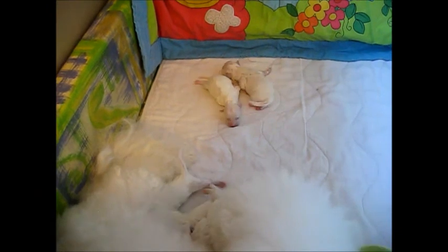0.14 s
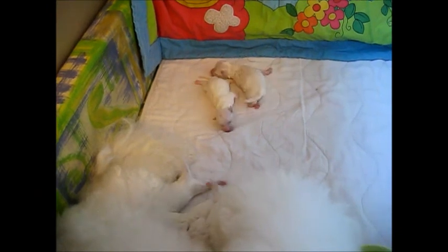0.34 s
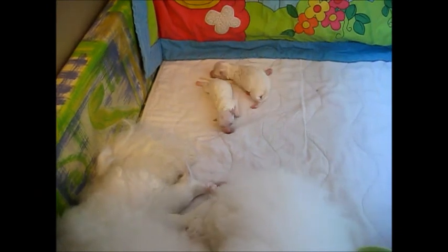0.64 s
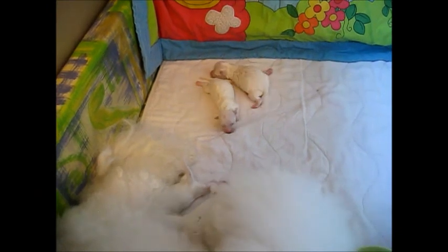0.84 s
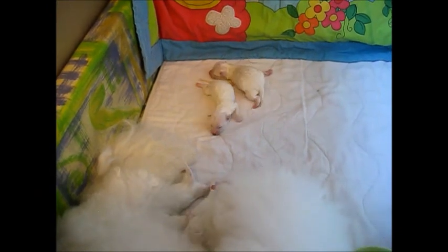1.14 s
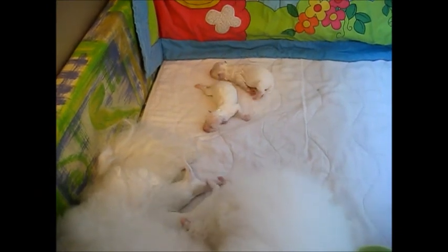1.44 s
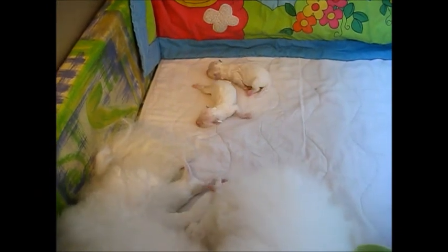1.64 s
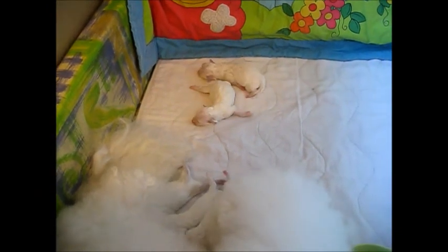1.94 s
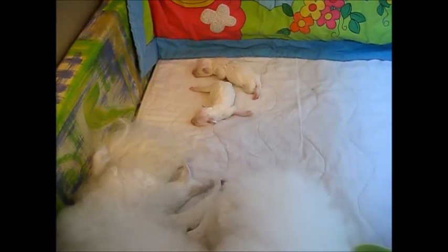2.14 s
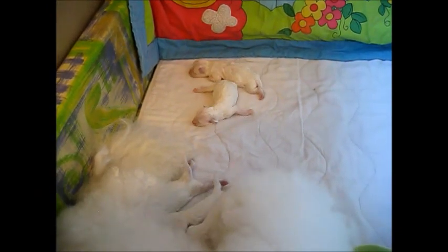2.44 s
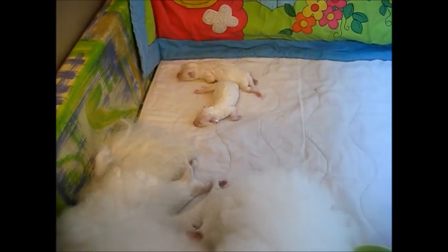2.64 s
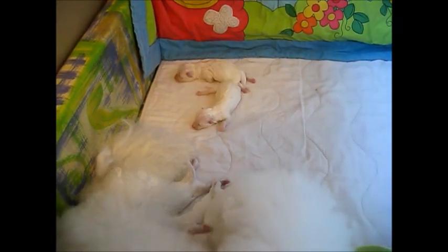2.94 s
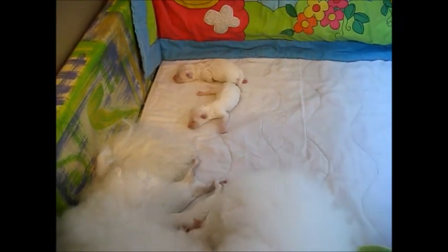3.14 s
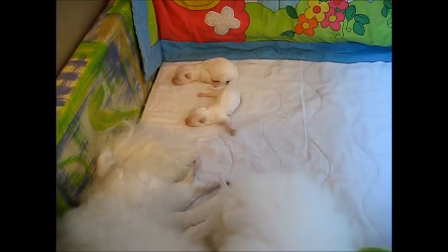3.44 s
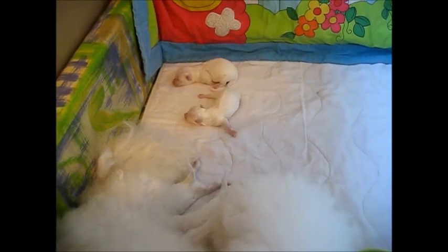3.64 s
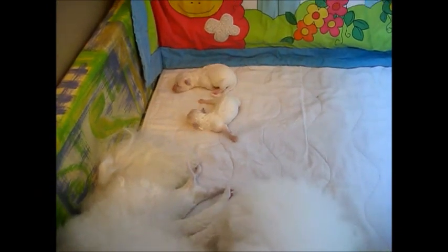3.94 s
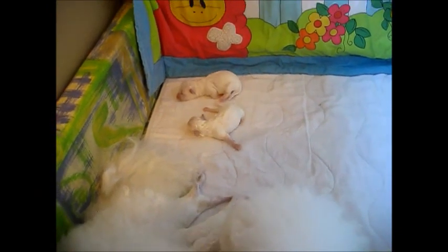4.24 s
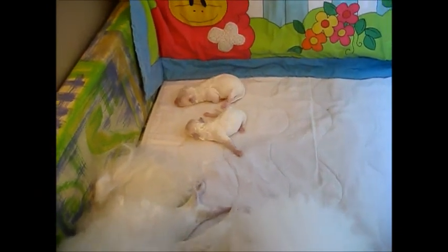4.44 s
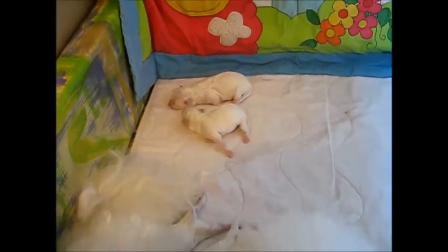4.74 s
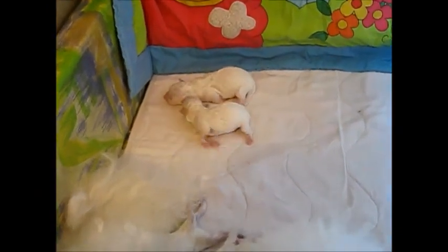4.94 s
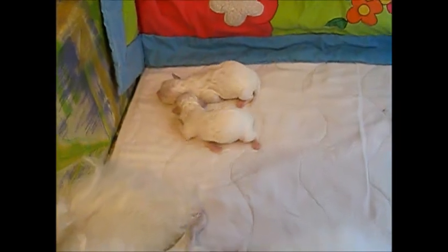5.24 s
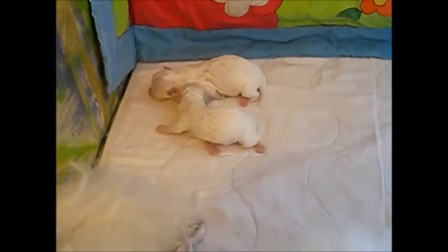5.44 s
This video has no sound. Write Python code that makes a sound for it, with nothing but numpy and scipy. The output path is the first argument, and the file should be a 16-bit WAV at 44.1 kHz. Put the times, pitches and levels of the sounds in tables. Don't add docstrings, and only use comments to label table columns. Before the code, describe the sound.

Bright hiss swells up over low room rumble and faint hum while tiny puppies squeak and whimper. One nearer pup leads with gliding cries; another briefly overlaps with thin high whistles. Light smacks and ticks appear early, louder clacks near four seconds. Bedding rustles, little snorts and breathy grunts mix into the later cries. Close, dry indoor sound, practically the same on both sides.

```python
import sys
import numpy as np
from scipy import signal
from scipy.fft import rfft, irfft
from scipy.io import wavfile
from scipy.ndimage import uniform_filter1d, minimum_filter1d

SR = 44100
rng = np.random.default_rng(int(sys.argv[2]) if len(sys.argv) > 2 else 0)


def transcribe(u):
    v = np.clip(np.atleast_2d(u).T, -1, 1)
    q = np.round(v * 32767).astype(np.int16)
    wavfile.write(sys.argv[1], SR, q)


def boost(x):
    u = np.asarray(x, float) / 20
    return 10 ** u


N = 246519


def evened(x):
    return x / np.sqrt(np.mean(x ** 2) + 1e-20)


def smooth_twice(x, size):
    return uniform_filter1d(uniform_filter1d(x, size=size), size=size)


def add(mix, start, sound):
    part = mix[round(start * SR):][:len(sound)]
    part += sound[:len(part)]


def columns(rows):
    s, *rest = np.transpose(rows)
    t = np.arange(s[0], s[-1], 1 / SR)
    return [np.interp(t, s, column) for column in rest]


def over_time(table):
    return np.interp(np.arange(N) / SR, *np.transpose(table))


def resonate(x, hz, width):
    turn = np.exp(2j * np.pi * np.cumsum(hz * np.ones(len(x))) / SR)
    r = np.exp(-np.pi * width / SR)
    return 2 * (turn * signal.lfilter([1 - r], [1, -r], x / turn)).real


def coloured(spectrum, patchy_db):
    frames, hz = N // 256 + 5, np.fft.rfftfreq(1024, 1 / SR)
    real, imaginary, patches = rng.standard_normal((frames, 513, 3)).T
    patches = evened(uniform_filter1d(uniform_filter1d(patches, size=14, axis=0), size=12, axis=1))
    streaks = rng.standard_normal((frames, 513)).T
    patches += 1.2 * evened(uniform_filter1d(streaks, size=30, axis=1))
    f, db = np.transpose(spectrum)
    shape_db = np.interp(np.log(hz + 1), np.log(f + 1), db)[:, None]
    bins = (real + 1j * imaginary) * boost(shape_db + patchy_db * patches)
    return evened(signal.istft(bins, nperseg=1024, noverlap=768)[1][:N])


# frequency in Hz, density in dB per Hz.
HISS = [(710, -21.5), (1200, -6.5), (1320, -9.5), (1430, -6.5), (1730, -8), (2320, -4), (2550, -4),
        (5100, -3), (7200, -6.5), (7930, -9), (9130, -4.5), (11500, -0.5), (13500, -7.5), (15800, -18.5)]
# time in seconds, hiss level in dB.
HISS_GAIN = [(0, -51.5), (.07, -50.5), (.13, -44.5), (.34, -44), (.45, -38), (0.601, -37.5), (.95, -37),
             (1.1, -39.5), (1.28, -35), (1.46, -36), (1.5, -38), (2.355, -39), (2.365, -36.5), (3.521, -35),
             (3.85, -37), (5.41, -37), (5.44, -34.5), (5.59, -36.5)]
# time in seconds, change in dB.
MID_DRIFT = [(0, -1), (1.5, 0), (2, 1.5), (2.35, 1), (2.6, -3), (2.9, -3), (3.3, -3), (3.5, 0), (5.59, 0)]
# time in seconds, change in dB.
TREBLE_WAKE = [(0, -6), (.25, -6), (.33, -2), (.45, 0)]


def hiss():
    steady = coloured(HISS, patchy_db=0.77)
    treble = signal.filtfilt(*signal.butter(3, 13900 / (SR / 2), "high"), steady)
    middle = signal.filtfilt(*signal.butter(2, [1700, 4300], "band", fs=SR), steady)
    middle *= boost(over_time(MID_DRIFT)) - 1
    treble *= boost(over_time(TREBLE_WAKE)) - 1
    return boost(over_time(HISS_GAIN) + 1.5) * (steady + middle + treble)


# frequency in Hz, density in dB per Hz.
RUMBLE = [(12, -35), (20, 9.5), (70, -9.5), (97, -3), (185, -5.5), (507, -3), (538, -3), (659, -3),
          (1260, -7.5), (1480, -6), (2500, -9.5), (3250, -7), (5500, -120)]
# frequency in Hz, width in Hz, level in dB.
HUM = (99, 12, -62)
# start in seconds, end in seconds, frequency in Hz, width in Hz, level in dB.
WHINE = (.08, 0.5, 10030, 60, -58)


def room():
    hz, width, db = HUM
    tones = boost(db) * evened(resonate(rng.standard_normal(N), hz, width))
    start, end, hz, width, db = WHINE
    size = round((end - start) * SR)
    motor = evened(resonate(rng.standard_normal(size), hz, width))
    add(tones, start, boost(db) * motor * signal.windows.tukey(size, .5))
    return boost(-48) * coloured(RUMBLE, patchy_db=1.0) + tones


# frequency in Hz, gain in dB.
THROAT = [(800, -0.5), (1300, -1), (2000, -1), (2900, 0), (3150, 1), (3500, 1), (4150, -1.5), (4700, -29)]


def squeaks(syllables):
    controls = np.zeros((4, N + 2))
    for rows, third_db in syllables:
        curves = np.array(columns(np.c_[rows, np.full(len(rows), third_db)]))
        first = round(rows[0][0] * SR)
        controls[:, first:][:, :curves.shape[1]] = curves[:, :N - first]
    sung = np.flatnonzero(controls[0])
    hz, effort_db, bright_db, third_db = (np.interp(np.arange(N), sung, c[sung]) for c in controls)
    breath = minimum_filter1d(-minimum_filter1d(-1. * (controls[0, :N] > 0), size=380), size=380)
    hz = smooth_twice(hz, 150)
    wobble = evened(uniform_filter1d(rng.standard_normal((4, N)), size=250, axis=1))
    turns = np.cumsum(hz * (1 + .002 * wobble[0])) / SR
    steps_db = [0 * hz, bright_db, third_db + 0.24 * bright_db]
    flutter_db = np.array([[.7], [1.1], [2.0]]) * wobble[1:]
    out = np.zeros(N)
    for k in range(3):
        throat_db = np.interp((k + 1) * hz, *np.transpose(THROAT))
        level = uniform_filter1d(breath * boost(effort_db + steps_db[k] + throat_db), size=220)
        out += level * boost(flutter_db[k]) * np.cos(2 * np.pi * (k + 1) * turns)
    return -np.sqrt(2) * out


# start in seconds, length in seconds, effort in dB, pitch in Hz, late glide in Hz.
PEEPS = [
    (0.251, .055, -50, 1610, -15),
    (2.069, .014, -38.5, 1603, -11),
    (4.83, 0.025, -37, 1342, 20),
    (4.857, .035, -48, 1300, -60),
    (5.168, .055, -35.5, 1912, -200),
]


def peep(start, length, db, hz, glide_hz):
    u = np.linspace(0, 1, num=6)
    return np.c_[start + length * u, hz + glide_hz * u ** 3.5, db - 3 * u, -14 + 0 * u]


# time in seconds, pitch in Hz, effort in dB, mouth brightness in dB per harmonic.
EARLY_CRIES = [
    [(.082, 1800, -48, -10), (.094, 1790, -39, -9), (.108, 1860, -40, -20), (.128, 1898, -37, -10),
     (.148, 1860, -33.5, -19), (.169, 1794, -32, -9.5)],
    [(.172, 1775, -31, -11), (.18, 1622, -26, -12.5), (.204, 1574, -28, -13), (.22, 1623, -28, -11),
     (.228, 1770, -35, -6), (.236, 1796, -43, -6), (.245, 1780, -50, -2)],
    [(1.91, 1710, -40.5, -11), (1.946, 1660, -33.5, -16), (1.958, 1330, -41, -7), (1.976, 1206, -45.5, 7),
     (1.993, 1150, -39.5, 7), (2.013, 1108, -43, 6), (2.035, 1140, -45, 6), (2.06, 1314, -48, -4)],
    [(2.258, 1398, -37, -11), (2.278, 1375, -30.5, -19), (2.305, 1370, -30, -22), (2.322, 1330, -36, -5)],
    [(2.326, 1314, -41, -2), (2.345, 1270, -39, -4), (2.363, 1244, -38.5, -7), (2.385, 1235, -46, -2),
     (2.4, 1250, -50, 5), (2.415, 1290, -45, -6)],
    [(2.997, 1201, -47, 8), (3.012, 1245, -48, 12), (3.026, 1278, -34, -3), (3.04, 1327, -30, -7.5),
     (3.057, 1322, -31, -5), (3.075, 1264, -35, 1), (3.088, 1243, -33.5, 0.5), (3.095, 1220, -48, 12),
     (3.105, 1205, -34.5, -2)],
    [(3.109, 1196, -35, -2), (3.117, 1176, -33, -2), (3.125, 1146, -42, 5), (3.135, 1113, -31.5, -1.5),
     (3.146, 1066, -37, 2), (3.156, 1032, -37.5, 8.5), (3.167, 1006, -39.5, 7), (3.181, 1025, -37, 5)],
]
LONG_WHINE = [
    [(.978, 870, -44, 12), (.996, 949, -41.5, -4), (1.012, 1048, -39.5, 8), (1.028, 1152, -33, 7),
     (1.048, 1250, -43, 4.5), (1.075, 1332, -33.5, 7), (1.092, 1376, -31, 0), (1.108, 1375, -36, 8.5),
     (1.126, 1312, -33, 8.5)],
    [(1.134, 1250, -37.5, -4), (1.149, 1182, -27, 3), (1.167, 1120, -32, 8.5), (1.187, 1145, -32, 9),
     (1.2, 1223, -36, -1)],
    [(1.208, 1312, -38.5, 6), (1.233, 1480, -27.5, -26), (1.257, 1531, -23.5, -7),
     (1.285, 1566, -23.5, -5.5), (1.301, 1611, -24, -18), (1.319, 1580, -24, -6), (1.335, 1486, -26.5, -14),
     (1.347, 1395, -36, -16)],
    [(1.355, 1338, -39, 6), (1.397, 1346, -44.5, 1), (1.415, 1370, -45, -14), (1.447, 1410, -36.5, -16),
     (1.468, 1350, -47, -16), (1.5, 1127, -42, 0.5), (1.522, 1025, -47, -3)],
]
WAVY_CRY = [
    [(3.381, 825, -50, 8), (3.395, 890, -50, 9), (3.405, 930, -52, 13), (3.42, 980, -44, 9),
     (3.436, 1042, -45, 7), (3.446, 1099, -40, 1), (3.457, 1180, -38, -4)],
    [(3.46, 1225, -38, -6), (3.468, 1311, -35.5, -11), (3.5, 1537, -35.5, 3), (3.516, 1525, -40, 7.5),
     (3.538, 1406, -29.5, -9), (3.56, 1250, -39, -1)],
    [(3.564, 1225, -37, -2), (3.579, 1138, -37, -8), (3.595, 1085, -38.5, 5.5), (3.626, 1075, -40, 9),
     (3.648, 1125, -36.5, -7), (3.665, 1187, -38.5, -4.5), (3.698, 1072, -38.5, 6.5), (3.738, 942, -44, 13),
     (3.758, 842, -46, 5)],
]
DIPPING_CRY = [
    [(3.863, 1150, -35.5, -10), (3.915, 1292, -30, -3.5), (3.937, 1250, -27.5, -6), (3.949, 1215, -31, -6),
     (3.961, 1173, -27, -17), (3.973, 1142, -31.5, -9), (3.985, 1129, -27, -12)],
    [(3.989, 1113, -29, -8), (3.998, 1084, -30.5, 0), (4.009, 1055, -32, 4), (4.021, 1015, -33, 5),
     (4.034, 982, -36, 6), (4.051, 968, -34, 4.5), (4.069, 980, -37, 5), (4.081, 1002, -41, 9),
     (4.1, 1085, -37, 3)],
    [(4.129, 1014, -41.5, 8), (4.171, 1068, -42.5, 9), (4.19, 1146, -36.5, -11), (4.204, 1250, -36.5, 1),
     (4.216, 1316, -36, -4), (4.238, 1452, -30.5, -4), (4.264, 1570, -41, 6.5)],
    [(4.272, 1422, -43, -15), (4.3, 1310, -47, -15)],
    [(4.335, 1812, -42.5, -3.5), (4.382, 1754, -38, -2), (4.45, 1760, -44.5, 1.5)],
    [(4.922, 1650, -55, 5.4), (4.947, 1720, -43, 1.7), (4.965, 1726, -57, 10.5)],
]
LATE_CRIES = [
    [(4.616, 1178, -34, -13), (4.671, 1324, -24.5, -8.5), (4.723, 1238, -24.5, -11.5),
     (4.755, 1211, -29.5, -4), (4.767, 1195, -27, -10.5), (4.803, 1072, -33, 8.5), (4.816, 1074, -35, 7),
     (4.827, 1109, -34, 4)],
    [(5.423, 1222, -29, -10), (5.455, 1250, -27.5, -12), (5.48, 1198, -24, -9), (5.5, 1138, -24.5, -3),
     (5.52, 1120, -25, -0.5), (5.54, 1094, -27, 1.5), (5.555, 1054, -31, 5), (5.58, 928, -40, 2),
     (5.59, 860, -34, 5)],
]
PURE_DB = -19


def first_pup():
    reedy = WAVY_CRY[2:] + EARLY_CRIES[4:5]
    soft = EARLY_CRIES[3::3]
    mild = LONG_WHINE + EARLY_CRIES[:3] + EARLY_CRIES[5:6] + WAVY_CRY[:1] + DIPPING_CRY[2:]
    pure = WAVY_CRY[1:2] + DIPPING_CRY[:2] + [peep(*row) for row in PEEPS]
    voices = [(reedy, -5.5), (LATE_CRIES, -23), (soft, -17), (mild, -9), (pure, PURE_DB)]
    return squeaks([(rows, third_db) for group, third_db in voices for rows in group])


# start in seconds, peak in dB, main ring in Hz,
# upper ring against it in dB, bright crack against it in dB.
TAPS = [(.227, -35, 2500, 4, -6), (.227, -40, 3300, 2, -6), (.304, -35, 1000, -8, -20),
        (.314, -32, 1400, -15, -20), (.316, -34.5, 800, -10, -20), (.42, -37, 235, -22, -30),
        (1.355, -27.5, 993.3, -4, -3), (3.8277, -18, 903, 2, -25), (3.8284, -23, 1450, 3.5, -25),
        (3.8316, -27, 1000, -3, -25), (3.8985, -32, 1097, -10, -25), (3.9023, -15, 840, -12, -25),
        (3.9034, -20, 2197, 0, -25), (3.903, -19, 2950, -10, -25), (3.909, -21.5, 604.5, -3, -25),
        (4.1413, -20, 2970, 0, 0), (4.143, -16, 2280, -4, -6), (4.1438, -20.5, 1005, 2.5, -3),
        (4.1428, -18, 4330, -6, -9), (4.1445, -19, 5900, -20, -6), (4.2024, -11.5, 5400, -18, -20),
        (4.2029, -3, 4360, -12.5, -0.5), (4.203, -7.5, 4800, -7, -20), (4.2055, -29, 4330, -20, -1),
        (4.203, -13, 2422, -9, -20), (4.2035, -28, 999, 6, -20), (4.2246, -22, 2050, -18, -20),
        (4.2246, -32, 1150, -3, -20), (5.125, -34.5, 454, -2, -20)]
# frequency in Hz, level in dB.
CRACK = [(6900, -15), (10500, 0), (11600, 3), (13100, 2.5)]


def tap(db, hz, upper_db, crack_db):
    t = np.arange(2000) / SR
    t60 = 0.0034 + 8 / hz
    fade = boost(-60 * t / t60) * np.minimum(t / 0.00021, 1)
    ring = np.sin(2 * np.pi * hz * t)
    ring += boost(upper_db) * np.sin(2 * np.pi * 1.66 * hz * t)
    ring += 0.2 * np.sin(2 * np.pi * 1.34 * hz * t)
    crack = sum(boost(mode_db) * np.sin(2 * np.pi * (mode_hz * t + rng.random())) for mode_hz, mode_db in CRACK)
    knock = boost(db) * (fade * ring + boost(crack_db) * fade ** 1.8 * crack)
    return signal.lfilter(*signal.butter(2, min(0.92 * hz, 900) / (SR / 2), "high"), knock)


# time in seconds, pitch in Hz, effort in dB, mouth brightness in dB per harmonic.
SECOND_PUP = [
    [(.357, 1956, -42, -8), (.41, 1937, -43.5, -11), (.47, 1922, -42, -6)],
    [(.679, 1654, -34.5, -20), (.695, 1630, -33.5, -16), (.704, 1574, -29.5, -13), (.71, 1410, -44, -4),
     (.716, 1270, -48, 0), (.735, 1230, -52, -4)],
    [(4.092, 1247, -31, -8), (4.102, 1276, -37, -9), (4.109, 1295, -41, 0), (4.116, 1316, -32, -8),
     (4.124, 1350, -43, 3), (4.134, 1380, -50, 4)],
    [(4.27, 1740, -38.5, -4), (4.28, 1765, -36, -6), (4.29, 1770, -49, -3), (4.3, 1790, -48, 2)],
]


def second_pup():
    return squeaks([(rows, PURE_DB) for rows in SECOND_PUP])


# start in seconds, length in seconds, level in dB, low edge in Hz, high edge in Hz.
PUFFS = [(2.367, 0.093, -41, 1790, 4580), (2.91, 0.03, -41, 1000, 1600), (2.911, 0.12, -39, 520, 2800),
         (2.91, .012, -41, 500, 800), (2.945, 0.013, -38, 620, 900), (3.019, 0.11, -48.5, 400, 810),
         (3.458, 0.13, -42, 399.3, 1000), (3.602, 0.11, -48, 1197, 1900), (3.945, .04, -42, 1400, 4000),
         (3.99, 0.085, -35.5, 1386, 3400), (5.425, 0.037, -32.5, 2000, 3300),
         (5.427, .014, -33.5, 400, 650), (5.445, 0.0106, -36, 450, 702), (5.452, .035, -31.5, 1399, 2700),
         (5.464, .016, -41, 3204, 3900), (5.489, .07, -38, 2500, 3500), (5.475, .012, -44, 400, 650)]


def puff(length, db, low_hz, high_hz):
    t = np.arange(0, length, 1 / SR)
    air, lumps = rng.standard_normal((2, len(t)))
    air = signal.sosfilt(signal.butter(3, [low_hz, high_hz], "band", fs=SR, output="sos"), air)
    lumps_db = 1.2 * evened(smooth_twice(lumps, 220))
    shape = np.minimum(t / .006, 1) * signal.windows.tukey(len(t), .1)
    return shape * boost(db - 6 * t / length) * evened(air * boost(lumps_db))


# time in seconds, pitch in Hz, level in dB.
GROAN = [(2.915, 596, -44), (2.93, 625, -41), (2.95, 638, -47), (2.975, 627, -45), (3.005, 586, -42)]
# time in seconds, pitch in Hz, level in dB.
MOAN = [(3.274, 558, -50), (3.284, 535, -41), (3.294, 500, -41), (3.304, 487, -39.5), (3.337, 481, -39),
        (3.346, 577, -40), (3.355, 586, -38.5), (3.368, 602, -41), (3.378, 740, -42.5)]
# frequency in Hz, gain in dB.
MOAN_THROAT = [(490, -11), (600, -3), (980, -10), (1200, -3), (1900, 0), (2350, -9), (2950, -6), (3500, -9),
               (4200, -20)]


def moan(rows, jitter):
    hz, db = columns(rows)
    wobble = evened(uniform_filter1d(rng.standard_normal((8, len(hz))), size=300, axis=1))
    turns = np.cumsum(hz * (1 + jitter * wobble[0])) / SR
    stack = np.zeros(len(hz))
    for k in range(1, 8):
        throat_db = np.interp(k * hz, *np.transpose(MOAN_THROAT))
        stack += boost(throat_db + 2.7 * wobble[k]) * np.cos(2 * np.pi * k * turns)
    out = np.zeros(N)
    add(out, rows[0][0], -boost(db) * stack * signal.windows.tukey(len(hz), .1))
    return out


# start in seconds, length in seconds, chest level in dB, mouth against the chest in dB,
# mouth opening as a factor.
GRUNTS = [
    (3.28, 0.14, -48, 1, 1.1),
    (3.458, 0.15, -43, 1, 0.72),
    (3.578, 0.14, -63, 19.5, 0.674),
    (5.421, 0.13, -37.5, 7.5, 1.05),
]
# frequency in Hz, width in Hz, level in dB.
MOUTH = [(1250, 270, 25), (1900, 540, 26), (2400, 790, 21), (2980, 770, -9), (3700, 390, -13)]


def grunt(length, db, mouth_db, opening):
    t = np.arange(0, length, 1 / SR)
    size = len(t)
    chest_hz = (1010 - 420 * opening) * (1 - 0.063 * t / length)
    uneven = evened(uniform_filter1d(rng.standard_normal(size), size=200))
    turns = np.cumsum(210 * (1 + .35 * uneven)) / SR
    pulses = np.diff(np.floor(turns), prepend=0) * boost(1.5 * rng.standard_normal(size))
    breath = (.15 + np.exp(-(turns % 1) / .4)) * rng.standard_normal(size)
    drive = .18 * evened(pulses) + .8 * evened(breath)
    chest = drive
    for width in (260, 310, 370):
        chest = resonate(chest, chest_hz, width)
    mouth = np.zeros(size)
    for hz, width, mode_db in MOUTH:
        narrow = resonate(drive, hz * opening, width)
        mouth += boost(mode_db) * resonate(narrow, hz * opening, 2 * width)
    effort = np.minimum(t / 0.013, 1) * boost(db - 9 * t / length) * signal.windows.tukey(size, .06)
    rasp_db = evened(smooth_twice(rng.standard_normal(size), 200))
    return effort * boost(rasp_db) * (evened(chest) + boost(mouth_db) * evened(mouth))


def box(x):
    t = np.arange(6000) / SR
    echo = boost(-42 - 60 * t / .12) * (t > .008) * rng.standard_normal(6000)
    echo[0] += 1
    return signal.oaconvolve(x, echo)[:N]


def scene():
    voices, taps = first_pup() + second_pup(), np.zeros(N)
    voices += moan(GROAN, jitter=.025) + moan(MOAN, jitter=.011)
    for start, *row in PUFFS:
        add(voices, start, puff(*row))
    for start, *row in GRUNTS:
        add(voices, start, grunt(*row))
    for start, *row in TAPS:
        add(taps, start, tap(*row))
    taps = signal.sosfilt(signal.butter(6, 13590, fs=SR, output="sos"), taps)
    return np.tile(box(voices) + taps + hiss() + room(), (2, 1))


# start in seconds, low edge in Hz, high edge in Hz, level in dB.
SLIPS = [(1.372, 10300, 11800, -45), (1.534, 4700, 5800, -51), (1.837, 5200, 6300, -55),
         (1.837, 11000, 12500, -47), (2.696, 12400, 13900, -52), (3.323, 4700, 5800, -49),
         (3.323, 7600, 9700, -49), (4.158, 5700, 7000, -51), (4.577, 7600, 9700, -50),
         (4.577, 11700, 13200, -50), (5.366, 10300, 12500, -45)]


def slips():
    out, hz = np.zeros(N), np.fft.rfftfreq(2048, 1 / SR)
    swell = np.sin(np.pi * np.arange(2048) / 2048)
    for start, low_hz, high_hz, db in SLIPS:
        band = irfft(rfft(rng.standard_normal(2048)) * (hz > low_hz) * (hz < high_hz))
        add(out, start, boost(db + 1) * evened(band) * swell)
    return out


def top_cut(x):
    return signal.sosfilt(signal.butter(12, 15980, fs=SR, output="sos"), x)


# frequency in Hz, width in Hz.
NOTCH = (7856, 1260)


def record(dry):
    hz, width = NOTCH
    notched = signal.lfilter(*signal.iirnotch(hz, hz / width, SR), dry, axis=1)
    notched = .9 * np.tanh(notched / .9)
    lowpass = signal.firwin(255, 15680, window=("kaiser", 8), fs=SR)
    limited = signal.oaconvolve(notched, lowpass[None], "same")
    mix = limited + np.outer([1, -1], slips())
    return top_cut(mix)


dry = scene()
out = record(dry)
transcribe(out)
```